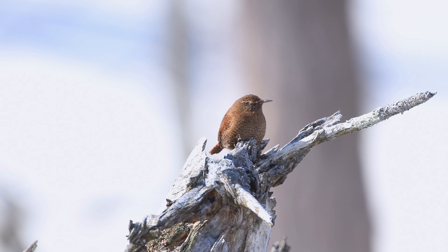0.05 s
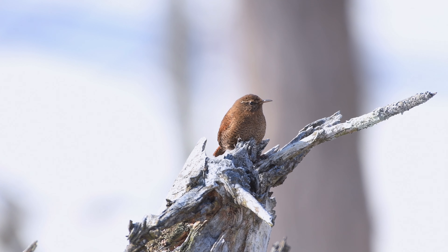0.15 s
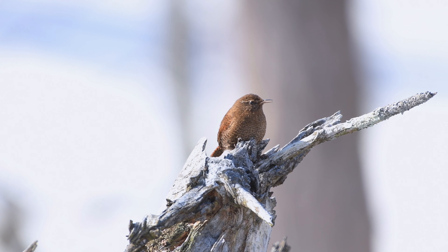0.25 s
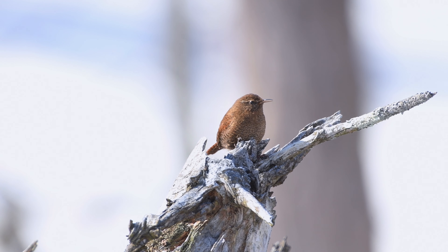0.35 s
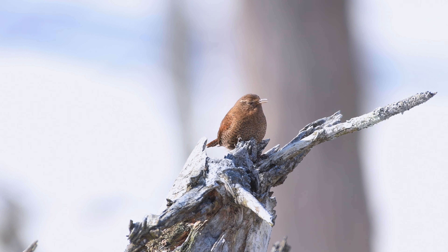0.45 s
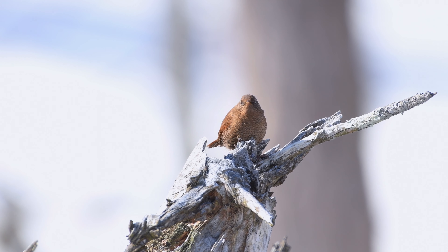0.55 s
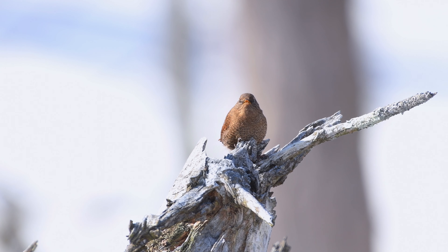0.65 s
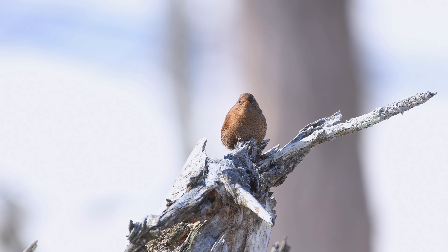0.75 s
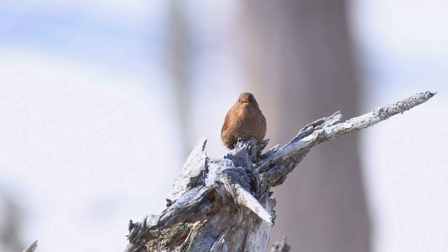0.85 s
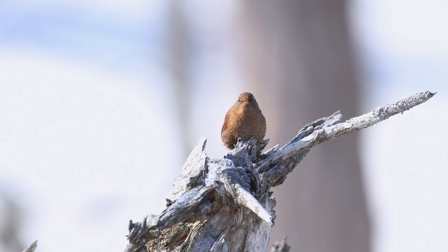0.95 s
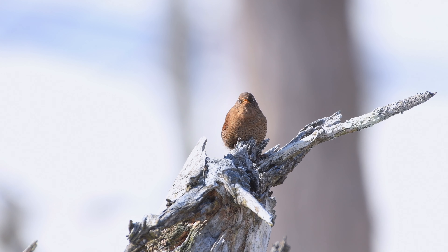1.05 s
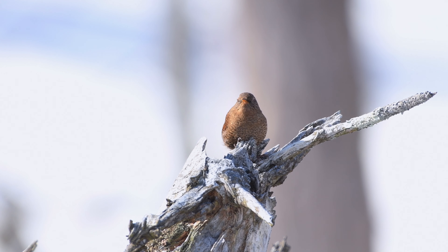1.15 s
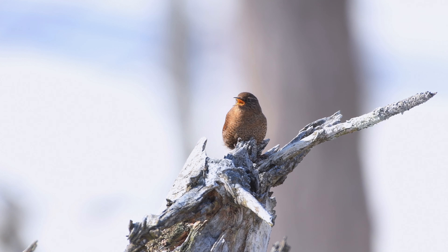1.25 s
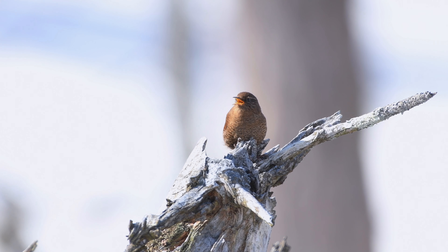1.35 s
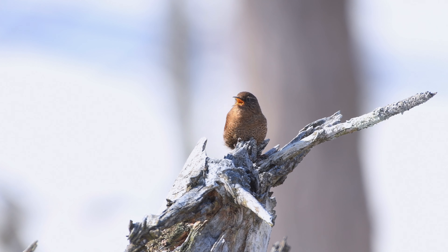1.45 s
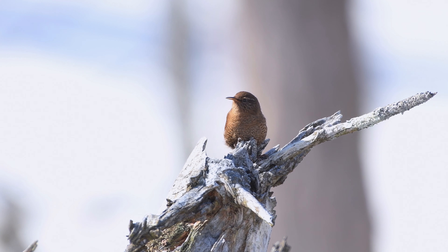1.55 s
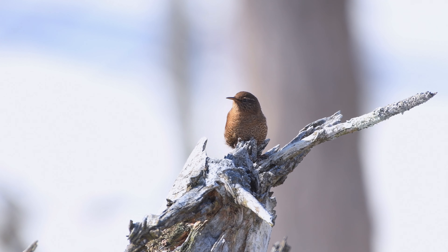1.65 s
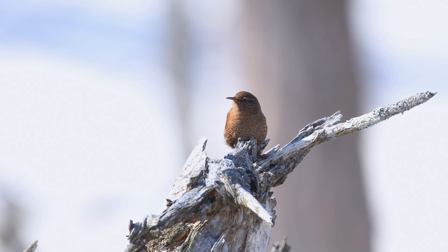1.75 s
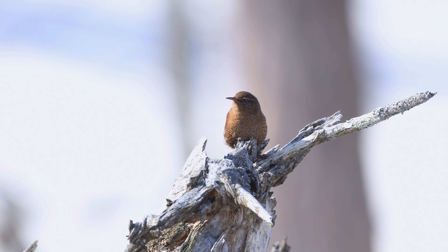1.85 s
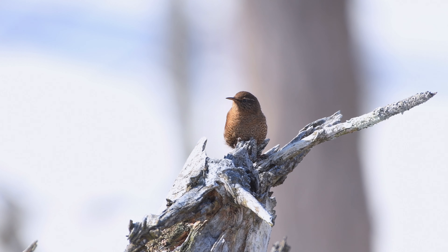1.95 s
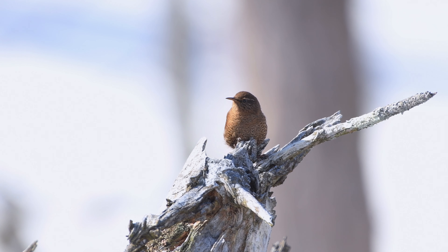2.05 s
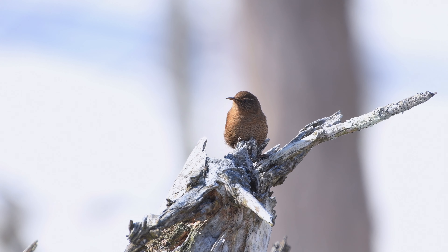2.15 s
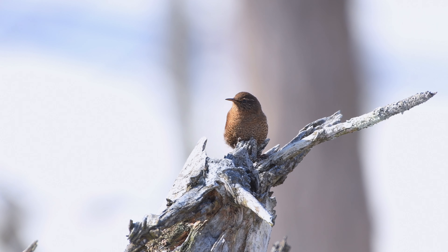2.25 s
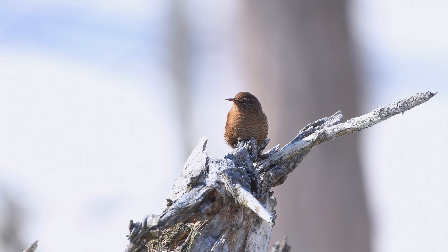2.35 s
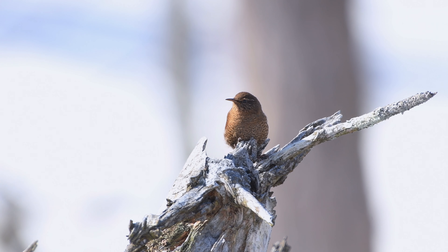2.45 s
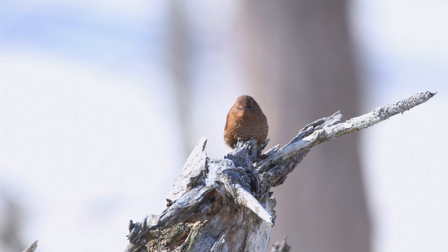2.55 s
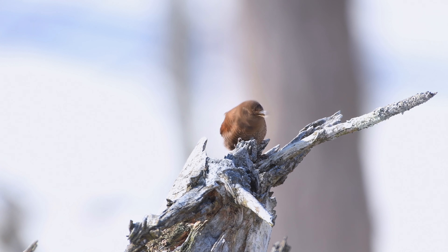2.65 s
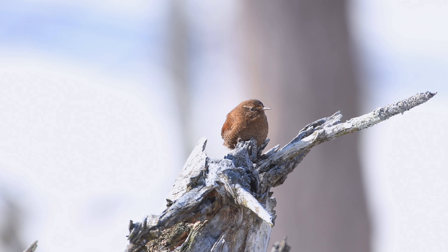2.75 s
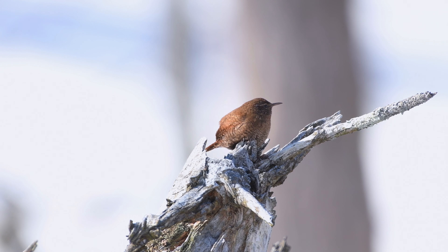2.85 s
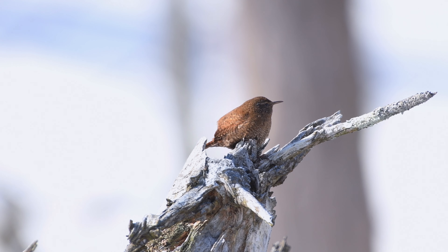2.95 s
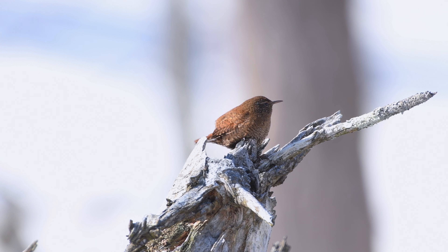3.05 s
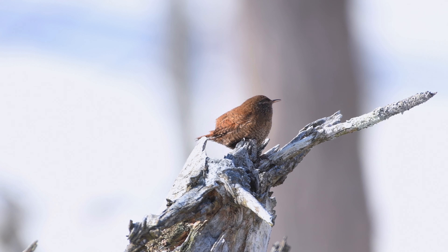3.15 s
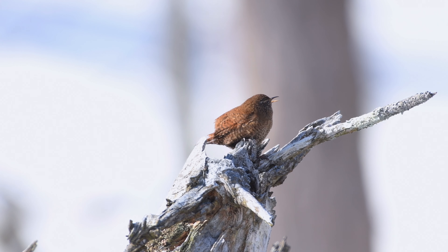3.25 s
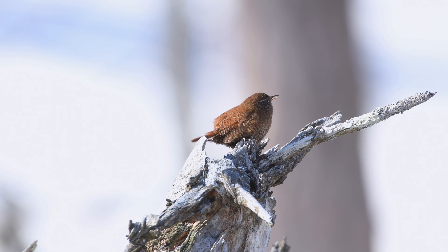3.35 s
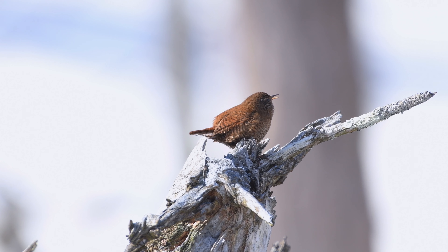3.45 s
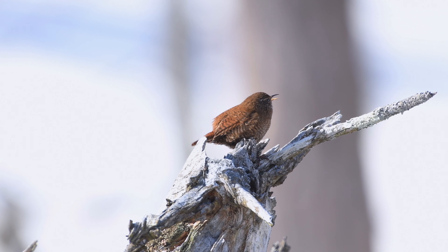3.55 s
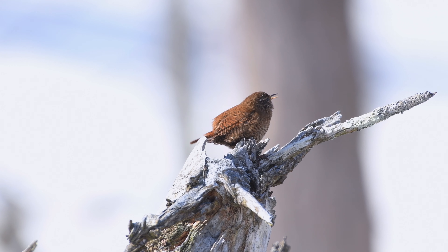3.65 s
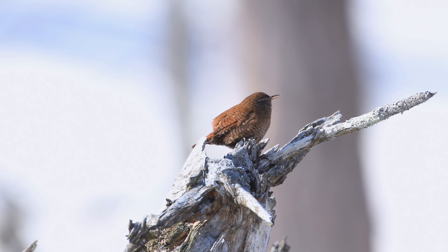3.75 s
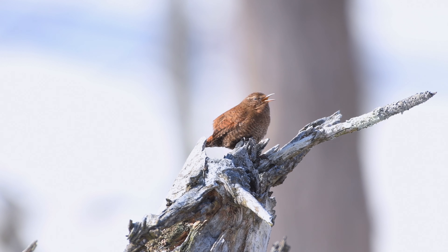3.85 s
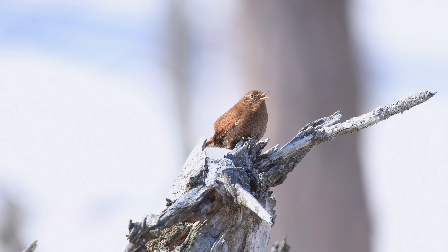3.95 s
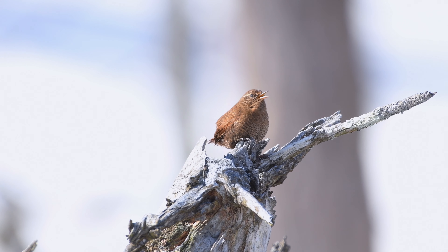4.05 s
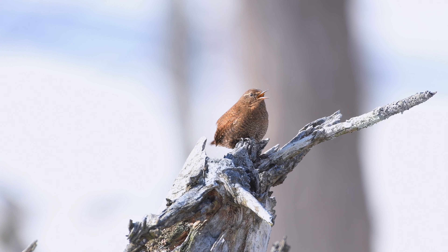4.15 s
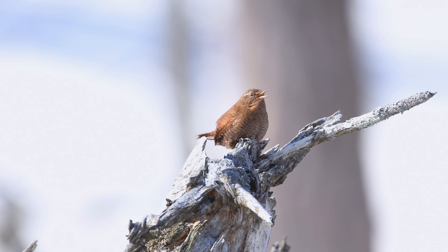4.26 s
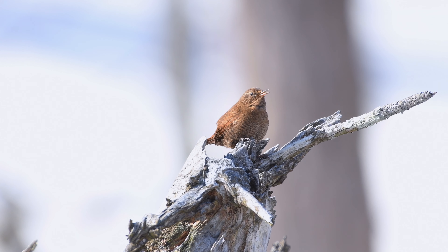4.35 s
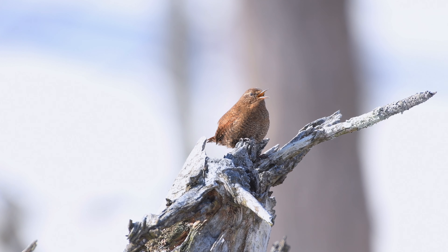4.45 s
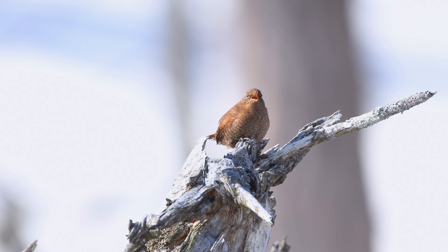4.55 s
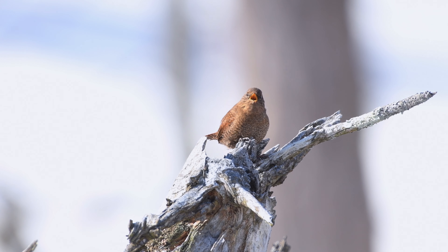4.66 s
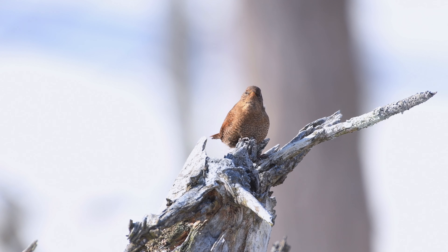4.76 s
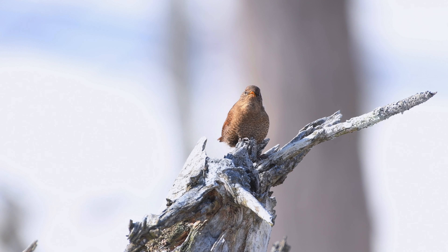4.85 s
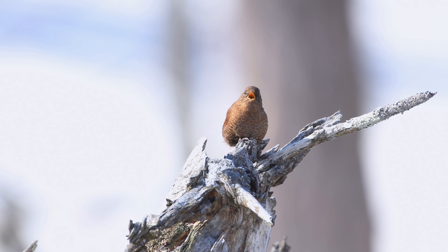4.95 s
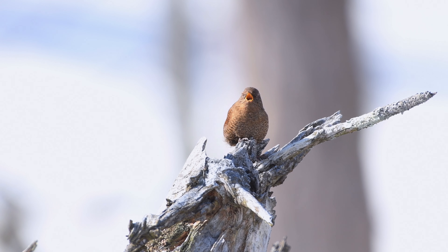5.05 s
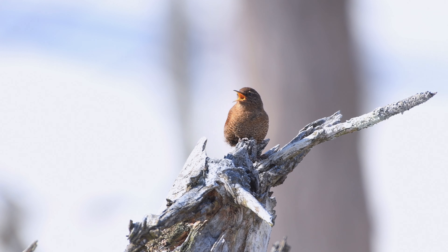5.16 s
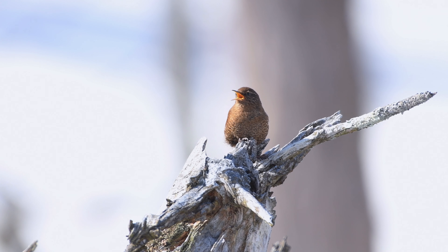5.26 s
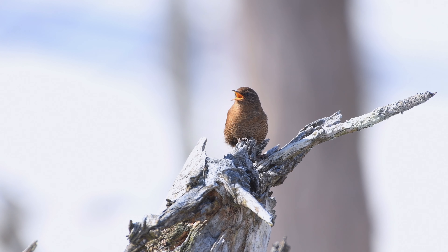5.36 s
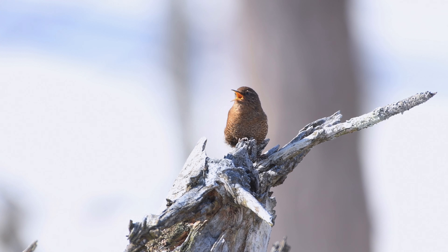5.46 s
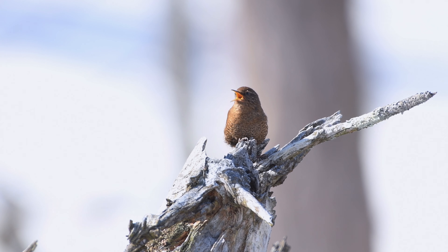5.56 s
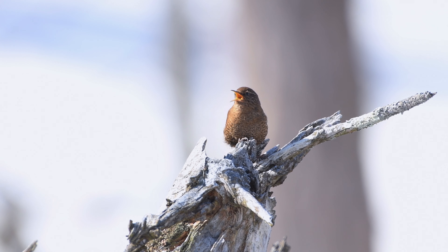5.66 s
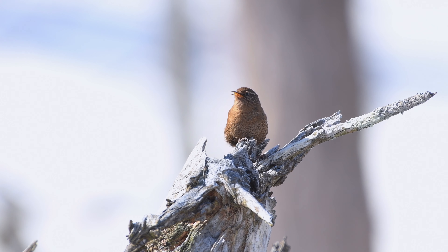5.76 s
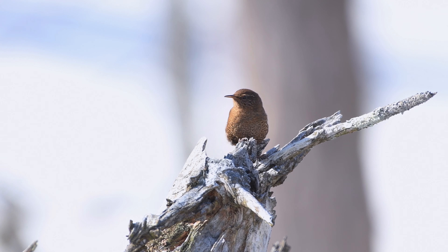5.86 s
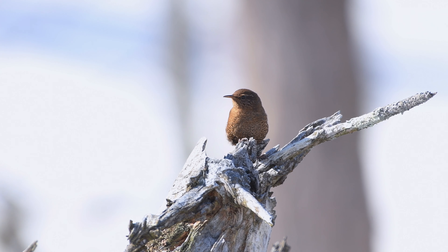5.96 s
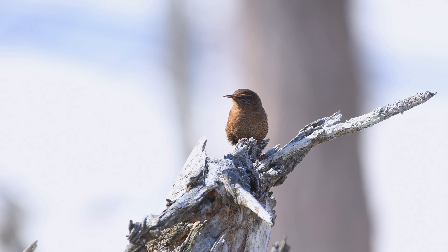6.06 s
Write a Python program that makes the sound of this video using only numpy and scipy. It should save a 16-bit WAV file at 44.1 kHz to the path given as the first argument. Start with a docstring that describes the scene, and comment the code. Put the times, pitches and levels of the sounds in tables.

```python
"""Wren in open woodland

A wren whistles two phrases of quick notes from a dead branch: nearly pure tones on drawn curves.
Delayed copies and tails of random taps stand for echoes off the branch and the trunks.
Light wind, made of lumpy low noise and single thumps, buffets the microphone over a far drone.
The camera adds shaped hiss, a faint whine of steady tones and two notch filters."""
import sys
import numpy as np
from scipy import signal
from scipy.fft import rfft, irfft, next_fast_len
from scipy.io import wavfile
from scipy.ndimage import uniform_filter1d

SR = 44100
rng = np.random.default_rng(int(sys.argv[2]) if len(sys.argv) > 2 else 0)


def dump(signal):
    """Clip the signal to [-1, 1] and save it as 16-bit WAV at the path in sys.argv[1]."""
    limited = np.clip(np.atleast_2d(signal).T, -1, 1)
    pcm = np.round(limited * 32767).astype(np.int16)
    wavfile.write(sys.argv[1], SR, pcm)


N = 268745  # length in samples


def gain_of(db):
    """Turns dB into a factor."""
    return 10 ** (np.asarray(db) / 20)


def evened(x):
    """Scales to rms 1."""
    return x / np.sqrt(np.mean(x ** 2) + 1e-20)


def read(points, hz):
    """Reads a curve of pitch between its points, on a log-frequency axis."""
    f, value = np.transpose(points)
    return np.interp(np.log(hz + 1), np.log(f + 1), value)


def coloured(points, channels):
    """Steady noise with the given spectrum, rms 1."""
    size = next_fast_len(N)
    shape = gain_of(read(points, np.fft.rfftfreq(size, 1 / SR)))
    white = rng.standard_normal((channels, size))
    return evened(irfft(rfft(white) * shape, size)[:, :N])


def wobble(seconds, size):
    """Random curve of rms about 1 that changes over the given time."""
    span = max(round(seconds * SR), 2)
    smooth = uniform_filter1d(uniform_filter1d(rng.standard_normal(size), span), span)
    return smooth * np.sqrt(1.5 * span)  # makes up for what the smoothing took away


def grain(s, hz, db, half_s):
    """A short bell-shaped burst of tone centred at s."""
    t = np.arange(N) / SR - s
    bell = np.exp(-(t / half_s) ** 2)
    return gain_of(db) * bell * np.sin(2 * np.pi * (hz * t + rng.random()))


# Colour of the hiss: pitch_hz, relative level_db (per Hz)
HISS_COLOUR = [(100, -27.5), (500, -1), (1000, 2.5), (1900, 1.5), (3500, -0.5), (5500, -1.5), (7000, -4),
               (9000, -7), (12000, -7.5), (15500, -11.5)]
HISS_DB = -64
# Steady tones of the whine: multiple (of WHINE_HZ), level_db
WHINE_TONES = [(2, -91), (3, -94), (4, -89), (5, -90), (9, -92), (10, -116), (11, -102), (12, -102)]
WHINE_HZ = 1170.4


def camera():
    """Own hiss of each channel and a steady whine of the electronics."""
    t = np.arange(N) / SR
    whine = np.zeros(N)
    for multiple, db in WHINE_TONES:
        whine += gain_of(db) * np.sin(2 * np.pi * (multiple * WHINE_HZ * t + rng.random()))
    return gain_of(HISS_DB) * coloured(HISS_COLOUR, channels=2) + np.sqrt(2) * whine


# Colour of the far rumble: pitch_hz, relative level_db (per Hz)
RUMBLE_COLOUR = [(20, -2.5), (40, -6.5), (100, -13), (250, -3.5), (450, -3.5), (700, -7.5), (1200, -16),
                 (2500, -42.5)]
RUMBLE_DB = -71
# Far wavering tones: pitch_hz, width_hz, level_db
DRONE_TONES = [(351.3, 14.5, -76), (444.4, 14, -84.5)]


def distance():
    """Far rumble and narrow tones wavering at random, the same on both sides."""
    t = np.arange(N) / SR
    out = gain_of(RUMBLE_DB) * coloured(RUMBLE_COLOUR, channels=1)
    for hz, width_hz, db in DRONE_TONES:
        drift = wobble(.5 / width_hz, N) + 1j * wobble(.5 / width_hz, N)
        out = out + gain_of(db) * (drift * np.exp(2j * np.pi * hz * t)).real
    return out


# Rise and fall of the wind: time_s, level_db
GUST_LEVELS = [(0.0, -66), (0.1, -68), (0.44, -58.5), (0.51, -67), (0.85, -61.5), (1.27, -70), (1.68, -66),
               (1.85, -74), (2.05, -58.5), (2.71, -69.5), (2.76, -61), (3.31, -58), (3.71, -70),
               (3.87, -59.5), (4.54, -72), (4.68, -55), (4.82, -77.5), (4.9, -73.5), (5.29, -72),
               (5.44, -76), (5.56, -63), (5.68, -73), (6.09, -83)]
# Colour of the buffeting: pitch_hz, relative level_db (per Hz)
BUFFET_COLOUR = [(15, -20), (30, -15.5), (60, -0.5), (100, 0), (170, -4), (260, -13.5), (400, -23.5),
                 (800, -50)]
# Strongest single eddies: start_s (the peak comes rise_s later), peak_db, pitch_hz
EDDY_THUMPS = [(0.283, -56.5, 80.7), (0.419, -55, 132), (0.571, -62, 127), (0.821, -47.5, 123),
               (1.336, -52, 120), (1.433, -53.5, 94.2), (1.597, -52, 129), (1.722, -55.5, 118),
               (1.856, -56, 99), (2.02, -43.5, 214), (2.839, -57, 95), (3.12, -53, 134), (3.319, -53, 110),
               (3.455, -47.5, 133), (3.874, -46.5, 180), (4.253, -59, 129), (4.696, -45, 143),
               (4.872, -53.5, 113), (5.041, -56.5, 136), (5.29, -50.5, 144), (5.492, -54, 139),
               (5.593, -52, 145)]


def wind(lumpy_db=3, lump_s=0.014, cycles=0.72, rise_s=0.012):
    """Eddies press on both ports alike: short lumps riding on the gusts, and single thumps."""
    s, db = np.transpose(GUST_LEVELS)
    gusts = gain_of(np.interp(np.arange(N) / SR, s, db))
    lumps = evened(coloured(BUFFET_COLOUR, channels=1) * gain_of(lumpy_db * wobble(lump_s, N)))
    thumps = sum(grain(at + rise_s, hz, peak_db, cycles / hz) for at, peak_db, hz in EDDY_THUMPS)
    return lumps * gusts + thumps


# How long the scattered sound lasts: pitch_hz, time_s (to fall by 60 dB, before the early lift)
TAIL_TIMES = [(3500, 0.7), (5000, 0.69), (6500, 0.48), (8500, 0.09)]
# Scattered sound against the direct sound: pitch_hz, level_db
TAIL_LEVELS = [(3500, -11.5), (5000, -11.5), (6200, -10), (7200, -10), (8500, -4)]


def wood(x, first_s=0.00071, near_db=6, near_s=0.041, alike=0.38, turn_s=0.08):
    """Sparse taps of random sign; three tails take turns as leaves and head move."""
    size, out = SR // 2, np.zeros((2, N))
    spacing = 20  # one tap in every 20 samples
    turn = np.pi * np.arange(N) / SR / turn_s
    for k in range(3):
        taps = np.zeros((3, size))
        jitter = rng.integers(0, spacing, (3, (size - 1) // spacing))
        at = np.arange(0, size - spacing, spacing) + jitter
        np.put_along_axis(taps, at, rng.choice([-1., 1.], at.shape), 1)
        # the third row is shared, so the two sides are partly alike
        taps = alike * taps[2] + np.sqrt(1 - min(alike, 1) ** 2) * taps[:2]
        hz, t, z = signal.stft(taps, SR, nperseg=256)
        decay_db = -60 * t / read(TAIL_TIMES, hz)[:, None]
        # near branches answer loudest
        shape = gain_of(decay_db + near_db * np.exp(-(t / near_s) ** 4))
        # even out each pitch band, then set its level
        energy = (shape ** 2).sum(1, keepdims=True) * 128 / spacing
        shape *= gain_of(read(TAIL_LEVELS, hz))[:, None] / np.sqrt(energy)
        tail = signal.istft(z * shape, SR, nperseg=256)[1]
        tail *= np.arange(tail.shape[1]) / SR > first_s
        # the three windows together keep the power steady
        window = np.sqrt(8 / 9) * np.cos(turn + k * np.pi / 3) ** 2
        out += signal.oaconvolve((x * window)[None], tail, axes=1)[:, :N]
    return out


# Echoes off the perch and near trunks: delay_s, left_db, right_db
NEAR_ECHOES = [(.0025, -26.5, -24.5), (.0098, -25, -12.5), (.029, -23.5, -28.5)]


def echoes(x):
    """Single reflections from hard wood close to the bird."""
    out = np.zeros((2, N))
    for delay_s, left_db, right_db in NEAR_ECHOES:
        late = round(delay_s * SR)
        out[:, late:] += gain_of([[left_db], [right_db]]) * x[:N - late]
    return out


# Louder side of the microphone: pitch_hz, left_minus_right_db
PORT_LEVELS = [(3800, 8), (4400, 4), (5000, 1.5), (6000, -3), (7000, 0), (8000, 0)]
# Later side of the microphone: pitch_hz, left_lag_rad
PORT_LAGS = [(3800, 0.05), (4400, 0.11), (5000, 0.99), (6000, 0.7), (7000, 1), (8000, .25)]


def ports(x):
    """The two microphone ports hear the bird with a level and phase offset that depend on pitch."""
    size = next_fast_len(N)
    hz = np.fft.rfftfreq(size, 1 / SR)
    side = np.array([[.5], [-.5]])
    offset = gain_of(side * read(PORT_LEVELS, hz)) * np.exp(-1j * side * read(PORT_LAGS, hz))
    return irfft(rfft(x, size) * offset, size)[:, :N]


THIRD_DB = -56  # third harmonic against the whistle at 3900 Hz; weaker above, gone from 5200 Hz


def whistle(rows, octave_db, waver_hz=20, low_hz=5200, tilt_db=25, pure_hz=6000, pure_db=150,
            flutter_db=0.77, flutter_s=0.0027):
    """One note: a nearly pure tone of the syrinx with faint overtones and a slight tremor."""
    s, hz, db = np.transpose(rows)
    t = np.arange(s[0], s[-1], 1 / SR)
    pitch = uniform_filter1d(np.interp(t, s, hz), size=150, mode="nearest")
    pitch = pitch + waver_hz * wobble(0.0025, len(t))
    turn = 2 * np.pi * np.cumsum(pitch) / SR
    # low pitches are less pure: both overtones weaken as the pitch rises
    third = gain_of(THIRD_DB) * np.clip(1 - pitch / low_hz, 0, 1) * 4
    tilt = tilt_db * np.log2(pitch / low_hz)
    extra_tilt = pure_db * np.maximum(np.log2(pitch / pure_hz), 0)
    octave = gain_of(octave_db - tilt - extra_tilt)
    tone = np.sin(turn) + octave * np.sin(2 * turn) + third * np.sin(3 * turn)
    fade = np.clip(np.minimum(t - s[0], s[-1] - t) / .0025, 0, 1)  # soft 2.5 ms ends
    curve_db = uniform_filter1d(np.interp(t, s, db), size=90, mode="nearest")
    level = gain_of(curve_db + flutter_db * wobble(flutter_s, len(t)))
    return np.sqrt(2) * level * np.sin(fade * np.pi / 2) ** 2 * tone


# First note of a phrase: start_s, length_s, low_hz, top_hz, peak_db,
# early_share (of the rise done at the peak)
OPENING_NOTES = [(0.211, .052, 4520, 5730, -61, .4), (3.214, 0.053, 4690, 5930, -46, 0.263)]
OPEN_PEAK, OPEN_START_DB, OPEN_END_DB = .45, -15, -18  # share of length at the peak; dB against it


def opener(start, length, low_hz, top_hz, db, early):
    """A soft note that swells, sliding up, and fades as it slides on."""
    return [(start, low_hz, db + OPEN_START_DB),
            (start + OPEN_PEAK * length, low_hz + early * (top_hz - low_hz), db),
            (start + length, top_hz, db + OPEN_END_DB)]


# Swelling notes that bend a little: start_s, length_s, pitch_hz, bend_hz, first_db, peak_db,
# peak_share (of the length at the peak)
SWELLING_NOTES = [(4.346, 0.02, 6480, -200, -53, -35.5, 0.36), (5.657, 0.028, 6104, 147, -42, -23.5, 0.72),
                  (5.747, .033, 6170, 450, -34.5, -28, 0.725)]
PIP_END_DB, PIP_SWELL = -9, .6  # dB against the peak; share of the swell done halfway to the peak


def pip(start, length, hz, lift_hz, first_db, db, share):
    """A short note that swells on one pitch, then bends."""
    return [(start, hz, first_db),
            (start + share / 2 * length, hz, first_db + PIP_SWELL * (db - first_db)),
            (start + share * length, hz + lift_hz / 2, db),
            (start + length, hz + lift_hz, db + PIP_END_DB)]


WHIP_RISE, FLICK_START_DB, FLICK_END_DB = 0.75, -32, -10  # share of rise; dB against whip, peak


def flick(start, length, low_hz, top_hz, db, share, whip_db, near_top=.93, crouch=0.221,
          crouch_rise=0.165):
    """A whip upward from a slow start that levels out, loudest near its top."""
    span = top_hz - low_hz
    return [(start, low_hz, whip_db + FLICK_START_DB),
            (start + crouch * length, low_hz + crouch_rise * span, whip_db + FLICK_START_DB / 2),
            (start + share * length, low_hz + WHIP_RISE * span, whip_db),
            (start + (share + 0.8) / 2 * length, low_hz + near_top * span, (db + whip_db) / 2),
            (start + 0.84 * length, top_hz, db),
            (start + length, top_hz, db + FLICK_END_DB)]


KNEE_HZ = 6430  # pitch where the climb ends and the leap begins
ROUND_S = 0.00348  # half the time spent turning in the trough
ATTACK_SHARE = 0.51  # full level after this share of linger and dive
DROP_SHARE, DROP_DONE = 0.62, .62  # share of the drop's time, and of its fall done by then
FLICK_S, RELEASE_DB = .011, -20  # last flick up, and its end against the shelf's end


def swoop(start, linger, dive, climb, leap, crest, drop, shelf,
          start_hz, low_hz, leap_hz, top_hz, shelf_hz, end_hz,
          first_db, dive_db, trough_db, climb_db, crest_db, early_db, late_db):
    """Linger, dive, climb, leap to a faint crest, drop to a held shelf, last flick up."""
    steps = [linger, dive, climb, leap, crest, drop, shelf]
    tip, low, knee, up, top, held, end = start + np.cumsum(steps)
    full = max(start + ATTACK_SHARE * (linger + dive), tip + .001)
    tip_db = dive_db + (first_db - dive_db) * (full - tip) / (full - start)
    full_hz = start_hz + (low_hz - start_hz) * (full - tip) / dive
    drop_hz = top_hz + DROP_DONE * (shelf_hz - top_hz)
    return [(start, start_hz, first_db), (tip, start_hz, tip_db), (full, full_hz, dive_db),
            (low - ROUND_S, low_hz, trough_db), (low + ROUND_S, low_hz, trough_db),
            (knee, KNEE_HZ, climb_db), (up, leap_hz, crest_db), (top, top_hz, crest_db),
            (top + DROP_SHARE * drop, drop_hz, (crest_db + early_db) / 2),
            (held, shelf_hz, early_db), (max(end - 2 * FLICK_S, held + .001), shelf_hz, late_db),
            (end - FLICK_S / 2, end_hz, late_db), (end, end_hz, late_db + RELEASE_DB)]


# Swooping notes: start_s; lengths linger_s, dive_s, climb_s, leap_s, crest_s, drop_s, shelf_s;
# pitches start_hz, trough_hz, crest_start_hz, crest_end_hz, shelf_hz, end_hz;
# levels start_db, dive_db, trough_db, climb_top_db, crest_db, shelf_start_db, shelf_end_db
SWOOPING_NOTES = [ (0.517, .003, 0.029, 0.015, 0.013, 0.017, 0.03, 0.045, 6620, 5700, 7200, 7250, 6520, 6770, -63, -40, -39, -42, -58.5, -59, -50.5),
                  (0.714, 0.0077, 0.016, 0.024, .013, 0.012, 0.015, 0.054, 5740, 5040, 6850, 6950, 6330, 6490, -56, -41.5, -36.5, -44.5, -57, -49, -44),
                  (0.907, 0.0038, 0.025, 0.028, 0.008, 0.029, 0.019, 0.033, 6170, 4763, 7350, 7590, 6720, 6840, -56, -36.5, -34, -39, -49.5, -41.5, -39),
                  (3.521, 0.015, .022, .021, 0.0086, 0.013, 0.043, 0.044, 6170, 4840, 7180, 7200, 6440, 6620, -57, -35.5, -39.5, -51, -55, -37.5, -47.5),
                  (3.729, 0.0059, .019, 0.018, 0.0133, 0.0116, 0.033, 0.031, 5650, 4815, 7190, 7260, 6650, 6690, -53, -39, -40, -51.5, -61, -43.5, -49.5),
                  (3.912, 0.0093, 0.024, 0.023, 0.012, 0.018, 0.036, 0.043, 5720, 4833, 6820, 7040, 6225, 6370, -58, -37.5, -34.5, -31.5, -43.5, -34.5, -34),
                  (4.121, .003, .026, .024, 0.0064, .026, 0.048, 0.035, 6310, 4686, 6880, 7070, 6330, 6690, -48, -32, -35, -32, -39, -38, -30.5),
                  ]
# Upward whips: start_s, length_s, low_hz, top_hz, peak_db, steep_share (of the length, where the
# steep part ends), steep_end_db, overtone_lift_db
WHIPPED_NOTES = [(5.61, .027, 3940, 6230, -26, 0.55, -30.5, 25),
                 (5.709, .026, 3890, 6110, -29, 0.41, -34, 26),
                 (5.806, 0.025, 4170, 6000, -33.5, .5, -36, 19)]
# Free whistles, one curve a note: time_s, pitch_hz, level_db
FREE_NOTES = [
    [(0.338, 7500, -73), (0.37, 7250, -59), (0.383, 6970, -63), (0.414, 7080, -61), (0.448, 7060, -63),
     (0.46, 7050, -69)],
    [(1.113, 4430, -59), (1.122, 4700, -64.5), (1.13, 4200, -54), (1.147, 3820, -58.5),
     (1.173, 3716, -53.5), (1.186, 3900, -58), (1.198, 3860, -62), (1.204, 3430, -79.5)],
    [(1.251, 6200, -62), (1.262, 7000, -57), (1.272, 7450, -48.5), (1.305, 7390, -39), (1.32, 7655, -46),
     (1.344, 7370, -38.5), (1.359, 7510, -36), (1.397, 7510, -40.5), (1.407, 7610, -35),
     (1.416, 7920, -38.5), (1.43, 7680, -53), (1.447, 7600, -34), (1.462, 6980, -60)],
    [(1.516, 6060, -59), (1.529, 6240, -34), (1.541, 5870, -35.5), (1.553, 5838, -25), (1.573, 5860, -30.5),
     (1.583, 5020, -41), (1.596, 4120, -44), (1.603, 3760, -57), (1.609, 4100, -46), (1.613, 4630, -58.5)],
    [(3.325, 8480, -73), (3.343, 8000, -61), (3.35, 7560, -78), (3.364, 7470, -52), (3.396, 7330, -59),
     (3.409, 7200, -53), (3.425, 7230, -58), (3.444, 6800, -55), (3.469, 7300, -63)],
    [(4.366, 4250, -58), (4.377, 4060, -50.5), (4.395, 4055, -43.5), (4.41, 3795, -54), (4.419, 4110, -47),
     (4.445, 3815, -52.5), (4.455, 3860, -46), (4.464, 3680, -71), (4.468, 3990, -54), (4.475, 4000, -54.5),
     (4.478, 3970, -67)],
    [(4.534, 6760, -60.5), (4.539, 6690, -42), (4.576, 7670, -41), (4.602, 8200, -47.5),
     (4.631, 7800, -37.5), (4.645, 7720, -34.5), (4.668, 7980, -38), (4.686, 8340, -44.5),
     (4.705, 8240, -69)],
    [(4.737, 6840, -45.5), (4.757, 6070, -24.5), (4.764, 5606, -27.5), (4.771, 5630, -29),
     (4.785, 6050, -26), (4.794, 6010, -25.5), (4.801, 5540, -31), (4.816, 4500, -38), (4.825, 4200, -53),
     (4.831, 4140, -52), (4.837, 3470, -64)],
    [(4.892, 4120, -50), (4.902, 4330, -42.5), (4.911, 4456, -34), (4.921, 4330, -40.5), (4.934, 4460, -33),
     (4.939, 4300, -40)],
    [(4.994, 7930, -58), (5.009, 7790, -42.5), (5.028, 7240, -50), (5.036, 7080, -39), (5.043, 7020, -31.5),
     (5.063, 6843, -36), (5.092, 6990, -29), (5.099, 7350, -36), (5.106, 7280, -44), (5.109, 6700, -57)],
    [(5.157, 7850, -47), (5.165, 7370, -36), (5.187, 7190, -34.5), (5.206, 7200, -38), (5.233, 7090, -36.5),
     (5.258, 7550, -33), (5.283, 7550, -44), (5.294, 7600, -33.5), (5.304, 6660, -51)],
    [(5.351, 7260, -66), (5.362, 7600, -42), (5.384, 7430, -58.5), (5.394, 7700, -41), (5.406, 7920, -43),
     (5.417, 7750, -58), (5.427, 7450, -35), (5.435, 7750, -26), (5.447, 7490, -43.5), (5.455, 6600, -64)],
    [(5.496, 6430, -41), (5.503, 6440, -34), (5.513, 5980, -28), (5.524, 5833, -33), (5.531, 5850, -30),
     (5.543, 5630, -29.5), (5.567, 4900, -37.5), (5.574, 4040, -67)],
]
# As the head turns: time_s, left_minus_right_db, octave_db (overtone under the whistle at 5200 Hz)
HEAD_TURNS = [(0.2, 2, -50), (0.52, 1.5, -50), (0.91, 2.5, -44), (1.12, -2.5, -50), (1.25, 1.5, -63),
              (1.52, 2, -48), (3.2, 2.5, -54), (3.33, 0, -50), (3.73, 2, -42), (4.12, 1.5, -56),
              (4.36, -1.5, -53), (4.74, 3.5, -49), (5.0, 4, -45), (5.16, 0, -55), (5.35, 1.1, -55),
              (5.5, 2.5, -29.5), (5.65, 3, -64), (5.82, 1.5, -54)]
# Brief dips of the voice inside a note: time_s, depth_db, half_length_s
VOICE_CATCHES = [(0.585, -8, .004), (0.966, -10, .003), (1.048, -15, .003), (1.317, -3, .005),
                 (1.362, -5, .003), (1.409, -10, .002), (3.651, -19, 0.013), (3.788, -8, .004),
                 (3.819, -6, .005), (3.844, -5, .005), (3.93, -3, 0.0034), (4.012, -10, 0.0098),
                 (4.055, -3, 0.0047), (4.139, -8.5, 0.0076), (4.18, -4, 0.004), (4.206, -19, 0.0037),
                 (4.239, -9, 0.007), (4.453, -16, .002), (4.582, -5, .003), (4.643, -11, 0.0033),
                 (5.098, -4, 0.0019), (5.368, -12, 0.0028)]
# Short ticks in and around the notes: time_s, pitch_hz, peak_db, half_length_s
SHORT_TICKS = [(3.473, 5540, -52.5, .0012), (4.365, 5260, -49, 0.0008), (4.888, 4180, -50, 0.0051),
               (5.613, 6900, -41.5, 0.00081), (5.73, 7090, -44, 0.0048)]


def song():
    """All notes, each leaning left or right, with their catches, and the ticks."""
    out = np.zeros((2, N))
    s, leans, octaves = np.transpose(HEAD_TURNS)
    curves = [swoop(*row) for row in SWOOPING_NOTES]
    curves += [opener(*row) for row in OPENING_NOTES]
    curves += [pip(*row) for row in SWELLING_NOTES]
    notes = [(rows, 0) for rows in curves + list(FREE_NOTES)]
    notes += [(flick(*row[:-1]), row[-1]) for row in WHIPPED_NOTES]
    for rows, extra_db in notes:
        at = rows[0][0]
        note = whistle(rows, np.interp(at, s, octaves) + extra_db)
        start = round(at * SR)
        lean_db = np.interp(at, s, leans)
        out[:, start:start + len(note)] += note * gain_of([[lean_db / 2], [-lean_db / 2]])
    t = np.arange(N) / SR
    dips_db = sum(db * np.exp(-((t - at) / half_s) ** 2) for at, db, half_s in VOICE_CATCHES)
    ticks = sum(grain(*row) for row in SHORT_TICKS)
    return out * gain_of(dips_db) + ticks


def scene():
    """Camera noise, distance, wind, and the bird with its echoes."""
    bird = song()
    middle = bird.mean(0)
    heard = ports(bird + echoes(middle) + wood(middle))
    return camera() + distance() + wind() + heard


# Notch filters: pitch_hz, width_hz
NOTCH_FILTERS = [(2615, 984), (7695, 1190)]
EDGE_HZ = 15680  # upper band limit


def record(dry):
    """Two notch filters, then the band limit."""
    out = dry
    for hz, width_hz in NOTCH_FILTERS:
        out = signal.lfilter(*signal.iirnotch(hz, hz / width_hz, SR), out)
    low_pass = signal.firwin(511, EDGE_HZ, window=("kaiser", 9), fs=SR)
    return signal.oaconvolve(out, low_pass[None], "same")


dry = scene()
out = record(dry)
dump(out)
```